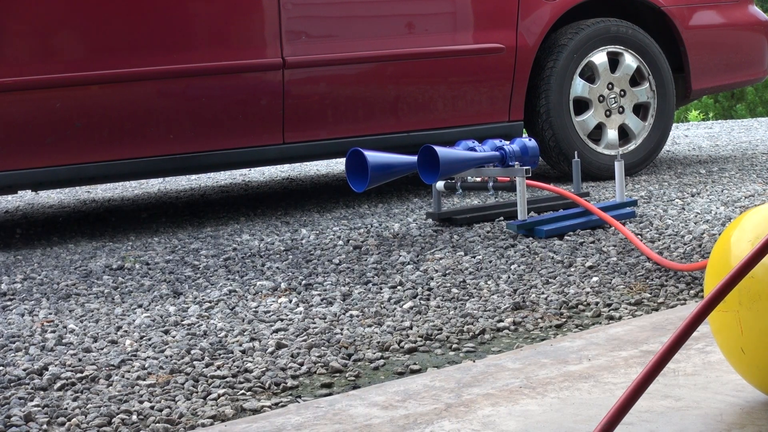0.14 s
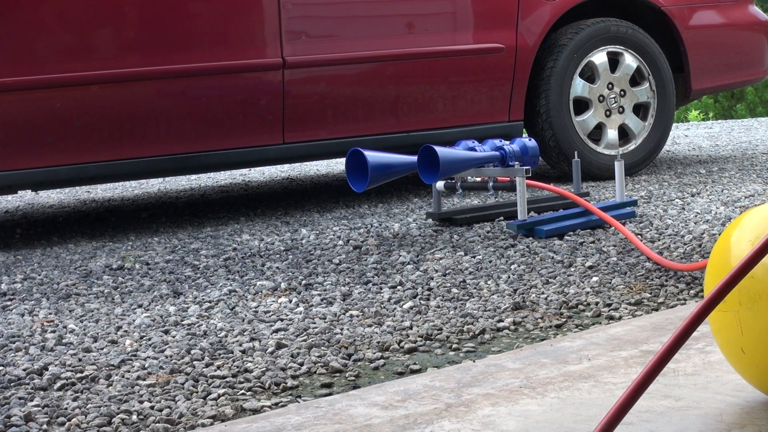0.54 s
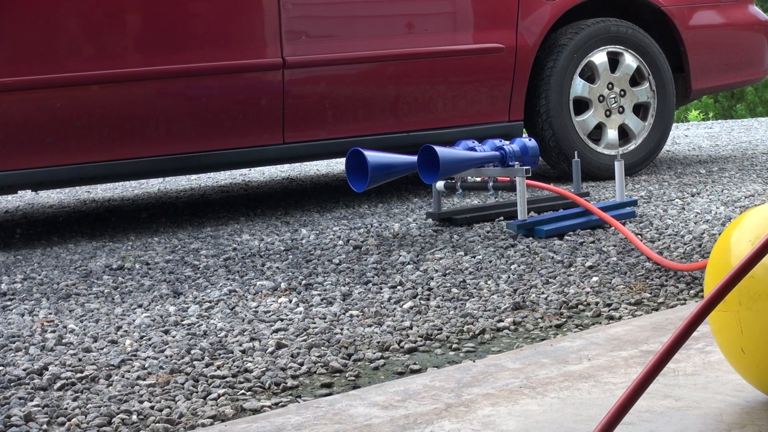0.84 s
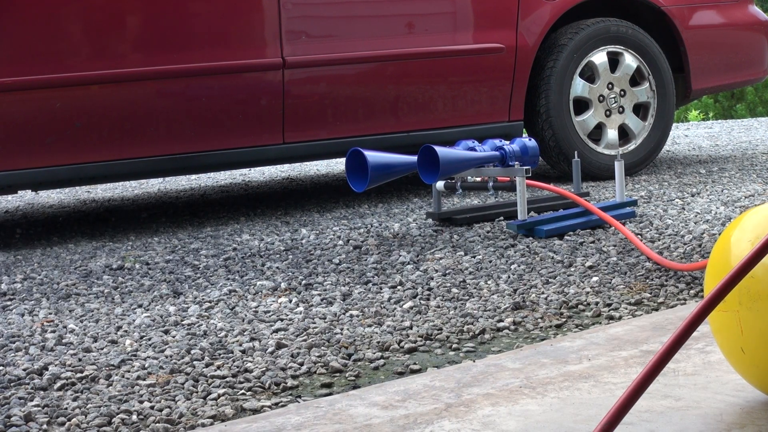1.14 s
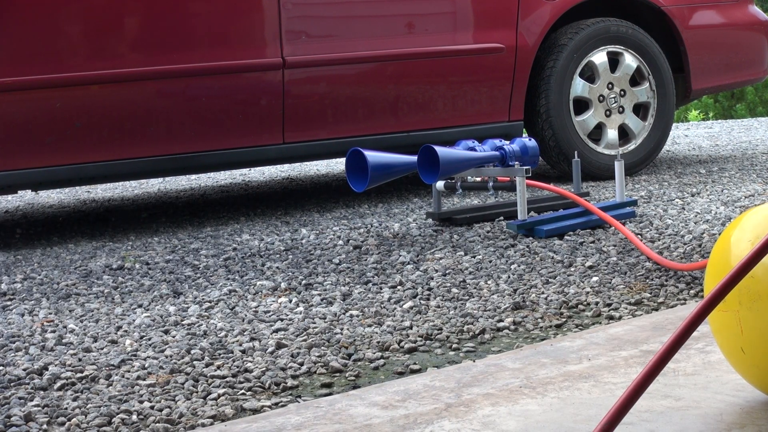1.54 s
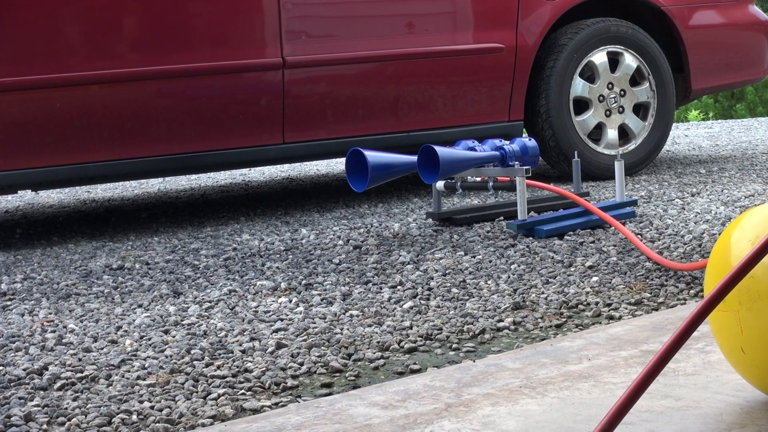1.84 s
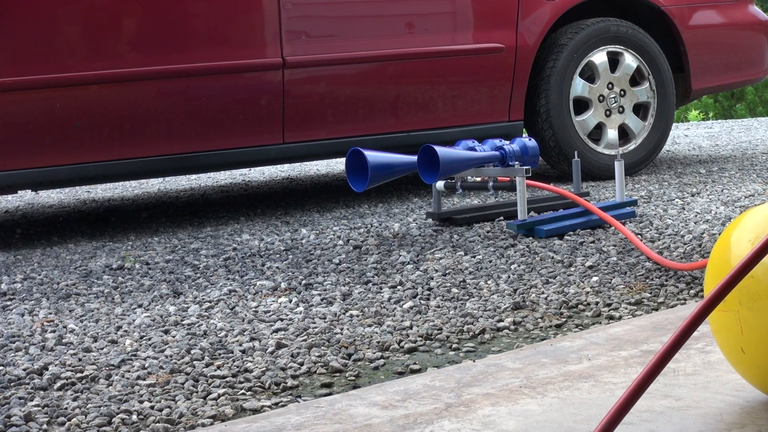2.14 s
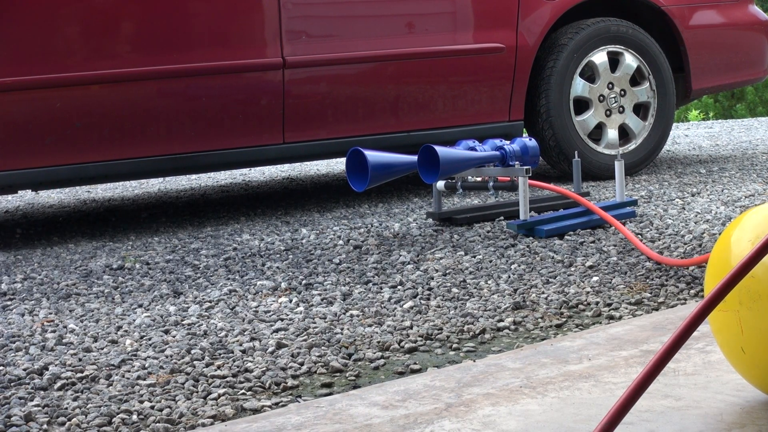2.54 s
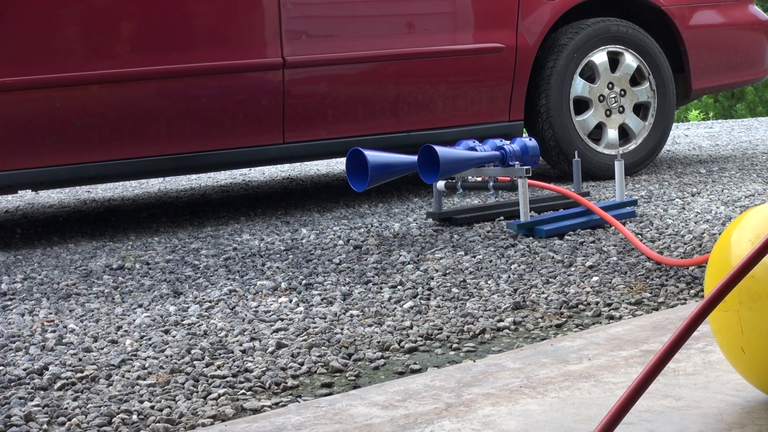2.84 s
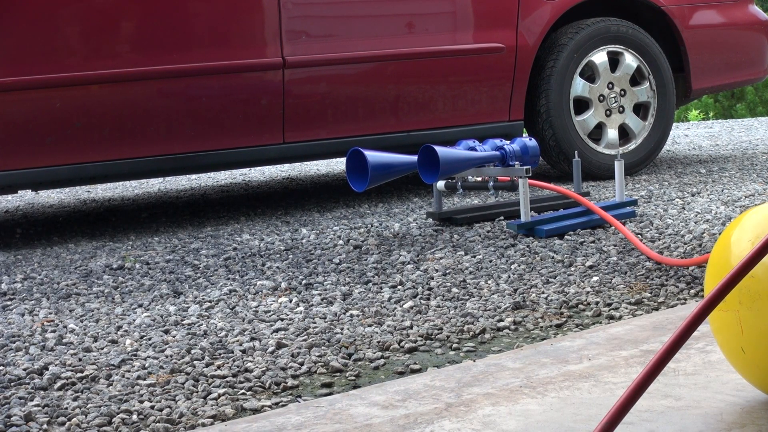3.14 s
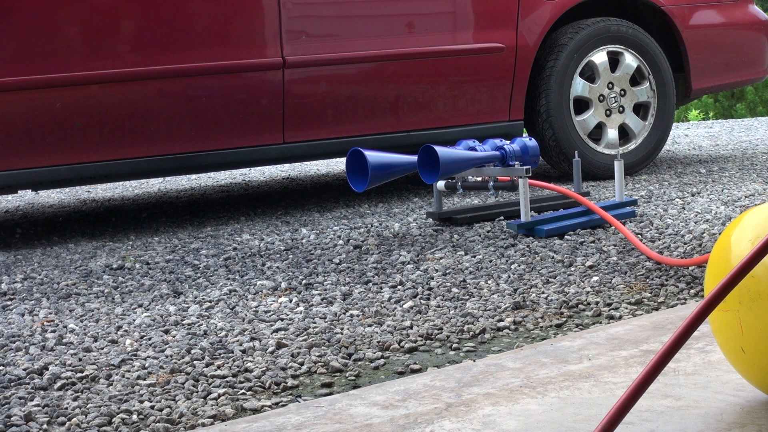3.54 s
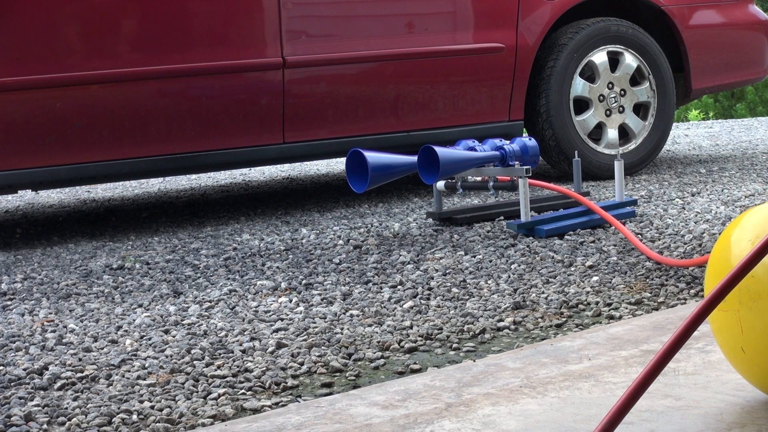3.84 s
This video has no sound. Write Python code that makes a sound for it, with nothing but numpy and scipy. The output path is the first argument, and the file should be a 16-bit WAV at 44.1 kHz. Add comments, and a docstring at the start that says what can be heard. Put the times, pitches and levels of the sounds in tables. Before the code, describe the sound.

Very loud multi-bell air horn beside a parked car: quiet open air with gravel scuffs, then an air hiss, notes entering in quick succession, a distorted steady blare, and a short echo as the air runs out.

```python
"""Gravel beside a parked car: a three-bell air horn heard from close by through a small camera microphone.
Quiet wait: noise of traffic and insects, gravel scuffs, wind puffs, a decaying-sine clink, bird chirps.
Then the valve hisses (coloured noise) and the bells speak one after another (stacks of overtones).
They overload the microphone and the recorder turns its gain down.
As the air runs out, delayed and coloured echoes from the surroundings are left."""
import sys
import numpy as np
from scipy import signal
from scipy.fft import rfft, irfft, next_fast_len
from scipy.io import wavfile

SR = 44100
rng = np.random.default_rng(int(sys.argv[2]) if len(sys.argv) > 2 else 0)


def output_pcm(signal):
    """Save a mono or channel-first signal as 16-bit PCM at the path in sys.argv[1].

    Samples are clipped to [-1, 1] before scaling.
    """
    pcm = np.clip(np.atleast_2d(signal).T, -1, 1) * 32767
    wavfile.write(sys.argv[1], SR, np.round(pcm).astype(np.int16))


N = 176400
TIME_S = np.arange(N) / SR


def amp(db):
    """Decibels to amplitude factor."""
    return 10 ** (np.asarray(db) / 20)


def in_time(rows):
    """Interpolates each column after t/s over the scene."""
    t_s, *columns = np.transpose(rows)
    return [np.interp(TIME_S, t_s, column) for column in columns]


def rms_one(x):
    """Scales to an RMS of 1."""
    return x / np.sqrt(np.mean(x ** 2))


def white():
    """Gaussian white noise."""
    return rng.standard_normal(N)


def drift(rate_hz):
    """Slow random wander of RMS 1: noise through a double pole at rate_hz, run at SR / 40."""
    pole = np.exp(-2 * np.pi * rate_hz * 40 / SR)
    noise = rng.standard_normal(N // 40 + 2002)
    slow = signal.lfilter([1], [1, -2 * pole, pole * pole], noise)[2000:]  # drop the run-in
    return np.interp(np.arange(N) / 40, np.arange(len(slow)), rms_one(slow))


def filtered(x, spectrum):
    """Zero-phase filter through (f/Hz, gain/dB) points, interpolated over log frequency."""
    hz, db = np.transpose(spectrum)
    size = next_fast_len(N + SR)
    log_f = np.log(np.arange(size // 2 + 1) * SR / size + 1)  # +1 avoids log(0)
    gain = amp(np.interp(log_f, np.log(hz), db))
    return irfft(rfft(x, size) * gain, size)[:N]


def coloured(x, spectrum):
    """Filtered noise of RMS 1."""
    return rms_one(filtered(x, spectrum))


def band(x, low_hz, high_hz):
    """Butterworth band-pass."""
    return signal.sosfilt(signal.butter(2, [low_hz, high_hz], "band", fs=SR, output="sos"), x)


def swells(rows):
    """Sum of Gaussian-shaped envelopes, each peaking half a length after its start."""
    return sum(amp(db) * np.exp(-8 * ((TIME_S - start_s) / length_s - .5) ** 2)
               for start_s, length_s, db in rows)


# distant traffic and open air: f/Hz, relative level/dB
AIR_COLOUR = [(15, -51), (25, -37), (58, 5), (119, -1), (169, -9.5), (198, -2.5), (340, -18.5), (378, -15),
              (567, -22.5), (871, -21), (2120, -34), (4620, -38.5), (15500, -49)]
AIR_DB, RUMBLE_SWELL_DB = -55.5, 2


def traffic_and_air():
    """Steady coloured noise whose 25-370 Hz rumble swells at random."""
    air = amp(AIR_DB) * coloured(white(), AIR_COLOUR)
    swell = amp(RUMBLE_SWELL_DB * drift(8)) - 1
    return air + swell * band(air, 25, 370)


# insect level: t/s, level/dB
INSECT_LEVEL = [(0., -87), (.7, -81), (.95, -85), (2.0, -83.5)]
INSECT_HZ, INSECT_WIDTH_HZ = 4670, 250


def insects():
    """Narrow noise band of unsteady level."""
    half_hz = INSECT_WIDTH_HZ / 2
    tone = rms_one(band(white(), INSECT_HZ - half_hz, INSECT_HZ + half_hz))
    return amp(in_time(INSECT_LEVEL)[0] + 2 * drift(20)) * tone


# gravel scuffs: start t/s, length/s, level/dB
GRAVEL_SCUFFS = [(.15, 0.064, -68), (.28, 0.055, -67), (.31, 0.15, -66.5), (.4, 0.16, -66),
                 (.66, 0.076, -61.5), (.71, 0.062, -63), (.76, 0.13, -70.5), (1.2, 0.21, -73)]
# gravel spectrum: f/Hz, relative level/dB
GRAVEL_COLOUR = [(530, -44.5), (900, -7), (1260, -4), (1450, -14), (1800, -3), (4880, -7.5), (7590, -14),
                 (15500, -25)]


def gravel():
    """Grainy noise: each sample gets a random boost, exponential in dB."""
    grains = white() * amp(2.4 * rng.exponential(1, N))
    return swells(GRAVEL_SCUFFS) * coloured(grains, GRAVEL_COLOUR)


# wind puffs: start t/s, length/s, level/dB
WIND_PUFFS = [(.33, 0.064, -45), (.37, 0.057, -48.5), (.43, 0.044, -44)]


def wind():
    """Low noise puffs of wind on the microphone."""
    return swells(WIND_PUFFS) * rms_one(band(white(), 32, 74))


# clink modes: f/Hz, relative level/dB, t60/s
CLINK_MODES = [(1800, -3, .25), (680, 0., .1), (400, 6, .12), (2650, -12, .08), (3420, -13, .08),
               (2950, -12, .15)]
CLINK_S, CLINK_DB, CLINK_RISE_S = 1.178, -66, .008


def clink():
    """Small struck sound: exponentially decaying sines with a linear rise."""
    t = np.maximum(TIME_S - CLINK_S, 0)
    ringing = sum(amp(CLINK_DB + db - 60 * t / t60_s) * np.sin(2 * np.pi * hz * t)
                  for hz, db, t60_s in CLINK_MODES)
    return ringing * np.minimum(t / CLINK_RISE_S, 1)


# far bird: start t/s, length/s, level/dB
BIRD_CHIRPS = [(1.335, .03, -79), (1.375, .025, -79), (1.415, .035, -78)]
CHIRP_HZ = 6800


def bird():
    """Short bursts of a narrow noise band."""
    return swells(BIRD_CHIRPS) * rms_one(band(white(), CHIRP_HZ - 300, CHIRP_HZ + 300))


def air_noise(level, colour):
    """Turbulent air: coloured noise of wavering level, gated to its table's span."""
    level_db, = in_time(level)
    gate = (TIME_S > level[0][0]) * (TIME_S < level[-1][0])
    return amp(level_db + drift(18)) * gate * coloured(white(), colour)


# leak at the valve: t/s, level/dB
VALVE_LEVEL = [(1.915, -67), (1.925, -49.5), (1.97, -50), (2.02, -43.5), (2.1, -32), (2.2, -4), (2.38, -7),
               (2.45, -38)]
# valve spectrum: f/Hz, relative level/dB
VALVE_SPECTRUM = [(180, -37), (300, -1), (543, 0), (731, -9), (907, -18), (1070, -17), (1970, -13),
                  (3810, -2), (4800, -10), (6460, -12), (15500, -20.5)]


def valve_hiss():
    """Compressed air leaking at the valve."""
    return air_noise(VALVE_LEVEL, VALVE_SPECTRUM)


# air through the bells: t/s, level/dB
RUSH_LEVEL = [(1.97, -77), (2.0, -47), (2.04, -31.5), (2.08, -29.5), (2.13, -22), (2.38, 0), (2.43, -34),
              (3.7, -11), (3.8, 7), (3.9, -6.5)]
# rush spectrum: f/Hz, relative level/dB
RUSH_SPECTRUM = [(530, -12), (900, 8), (1050, -31), (1160, 12), (1260, 6), (1730, -11), (2360, 5),
                 (3030, 6.5), (4660, -43), (6650, -18), (15500, -32)]


def bell_rush():
    """Compressed air rushing through the bells."""
    return air_noise(RUSH_LEVEL, RUSH_SPECTRUM)


WAVER_HZ, WAVER_DB = .25, .5  # RMS unsteadiness of pitch and level
TOP_FALL_DB = 6.5  # loss per overtone beyond the tone table
DULL_BEND = 1.348  # dulling grows as this power of octaves above the fundamental


def bell(pitch, blow, tone, root_db=0):
    """Beating diaphragm: 32 harmonics whose balance follows the blowing; root_db is the fundamental's alone."""
    hz, = in_time(pitch)
    level_db, dull_db = in_time(blow)
    phase = 2 * np.pi * np.cumsum(hz + WAVER_HZ * drift(14.9)) / SR
    multiple, tone_db = np.transpose(tone)
    out = np.zeros(N)
    for m in range(1, 33):
        partial_db = np.interp(m, multiple, tone_db - tone_db[0])
        partial_db = partial_db - TOP_FALL_DB * max(m - multiple[-1], 0) + root_db * (m == 1)
        partial_db = partial_db - dull_db * np.log2(m) ** DULL_BEND
        out += amp(partial_db) * np.sin(m * phase + rng.uniform(0, 2 * np.pi))
    gate = (TIME_S > blow[0][0]) * (TIME_S < blow[-1][0])
    return out * amp(level_db + WAVER_DB * drift(7.3)) * gate


# high bell pitch: t/s, f/Hz
HIGH_BELL_PITCH = [(2.03, 375.8), (2.4, 375.4), (2.47, 378), (2.55, 375.5), (2.66, 373.7), (3.0, 373.1),
                   (3.52, 372.8), (3.68, 370.8), (3.8, 372.6), (3.95, 372)]
# high bell blowing: t/s, level/dB, overtone dulling at one octave/dB
HIGH_BELL_BLOW = [(1.97, -62, 11), (2.03, -34, 13), (2.09, -3, 25.5), (2.141, 19, 10), (2.2, 26.5, 5),
                  (2.38, 24, 3), (2.422, 33, 0.5), (3.7, 32, 0.5), (3.78, 29, 7), (3.86, 24, 11.5),
                  (3.9, 13.5, 11), (3.95, -9, 9)]
# high bell overtones at zero dulling: multiple of f, level/dB (used re first row)
HIGH_BELL_TONE = [(1, 2), (2, 0.5), (3, -10), (4, -18), (5, -33), (6, -13), (7, -17), (8, -8), (9, -23),
                  (10, -13), (11, -39), (12, -23)]


def high_bell():
    """Highest diaphragm, near 374 Hz."""
    return bell(HIGH_BELL_PITCH, HIGH_BELL_BLOW, HIGH_BELL_TONE)


# low bell pitch: t/s, f/Hz
LOW_BELL_PITCH = [(2.05, 261.4), (2.4, 261.0), (2.47, 261.7), (2.65, 260.2), (3.0, 259.7), (3.52, 259.3),
                  (3.66, 258.3), (3.9, 258.4)]
# low bell blowing: t/s, level/dB, overtone dulling at one octave/dB
LOW_BELL_BLOW = [(1.99, -64, -3), (2.051, -40.5, 0.5), (2.102, -12.5, 16), (2.142, 11, 4), (2.198, 20.5, 3),
                 (2.381, 23.5, 4.5), (2.5, 18.5, -1), (3.65, 18, 1), (3.779, 25, 2.5), (3.86, 13, 8),
                 (3.92, -40, 1)]
# low bell overtones at zero dulling: multiple of f, level/dB (used re first row)
LOW_BELL_TONE = [(1, -2.5), (2, 3), (3, -1.5), (4, -3.5), (5, -9.5), (6, -13.5), (7, -10), (8, -3),
                 (9, -14), (10, -12.5), (11, -34.5), (12, -22.5)]
# low bell, change in the fundamental alone: t/s, level/dB
LOW_BELL_ROOT = [(2.12, 4), (2.17, -11), (2.4, -12.5), (2.5, 0.), (3.68, 2.5), (3.8, -13), (3.87, 1.5)]


def low_bell():
    """Lowest diaphragm, near 260 Hz, with its fundamental's level moving separately."""
    return bell(LOW_BELL_PITCH, LOW_BELL_BLOW, LOW_BELL_TONE, *in_time(LOW_BELL_ROOT))


# middle bell pitch: t/s, f/Hz
MID_BELL_PITCH = [(2.44, 320), (2.5, 316.8), (2.61, 315.3), (2.82, 314.7), (3.5, 314.2), (3.66, 312.0),
                  (3.9, 312.2)]
# middle bell blowing: t/s, level/dB, overtone dulling at one octave/dB
MID_BELL_BLOW = [(2.38, -26, 11), (2.44, 25, 1.5), (2.49, 27, -0.5), (3.0, 25, -1), (3.65, 26, -0.5),
                 (3.74, 26, 1.5), (3.82, -3, 8), (3.9, -37, -5)]
# middle bell overtones at zero dulling: multiple of f, level/dB (used re first row)
MID_BELL_TONE = [(1, -1), (2, -12.5), (3, -2.5), (4, -14.5), (5, -16.5), (6, -21), (7, -7.5), (8, -9.5),
                 (9, -13), (10, -10), (11, -20.5), (12, -20)]


def mid_bell():
    """Middle diaphragm, near 315 Hz."""
    return bell(MID_BELL_PITCH, MID_BELL_BLOW, MID_BELL_TONE)


# send into the echo, one per bell (low, mid, high): level/dB
BELL_SEND_DB = [-14, -29, -28.5]
# echo spectrum: f/Hz, gain/dB
ECHO_SPECTRUM = [(255, -11.5), (315, -4.5), (375, -11.5), (520, -12), (630, 2.5), (760, -2.5), (940, -6),
                 (1040, -1), (1300, -5), (1560, -4.5), (1810, 0.5), (2070, -13.5), (2600, -9), (4000, -6),
                 (8000, 33), (15000, 10)]
# reflections: delay/s, level/dB
REFLECTIONS = [(.17, -15.5), (.26, 3), (.41, -3.5)]


def echoes(low, mid, high):
    """Delayed, coloured copies of the bells from the surroundings."""
    far = filtered(amp(BELL_SEND_DB) @ np.array([low, mid, high]), ECHO_SPECTRUM)
    far = far * (TIME_S > LOW_BELL_BLOW[0][0])  # no filter ringing ahead of the blast
    return sum(amp(db) * np.pad(far, (int(delay_s * SR), 0))[:N] for delay_s, db in REFLECTIONS)


# diffuse echo of the air noise: t/s, level/dB
AFTER_LEVEL = [(3.8, -30), (3.9, -7.5), (4.05, -2.5)]
# diffuse echo spectrum: f/Hz, relative level/dB
AFTER_SPECTRUM = [(150, -36.5), (250, -18), (450, -18), (755, -6), (852, -18), (1030, -1), (1160, -18),
                  (1850, -9), (15500, -52)]


def after_hiss():
    """Diffuse echo of the air noise, as separate noise."""
    return air_noise(AFTER_LEVEL, AFTER_SPECTRUM)


def scene():
    """Sums all sources into two identical channels."""
    yard = traffic_and_air() + insects() + gravel() + wind() + clink() + bird()
    air = valve_hiss() + bell_rush() + after_hiss()
    high, low, mid = high_bell(), low_bell(), mid_bell()
    horn = high + low + mid + echoes(low, mid, high)
    return np.tile(yard + air + horn, (2, 1))


def gain_control(x, aim_db, attack_s, release_db_per_s, ahead_s=0):
    """Turns peaks above the aim down with a smoothed attack and lets go at a constant dB rate."""
    over_db = np.maximum(20 * np.log10(np.abs(x).max(0) + 1e-9) - aim_db, 0)
    slope_db = release_db_per_s * TIME_S
    held_db = np.maximum.accumulate(over_db + slope_db) - slope_db
    pole = np.exp(-1 / (attack_s * SR))
    cut_db = signal.lfilter([1 - pole], [1, -pole], held_db)
    ahead = int(ahead_s * SR)
    return x * amp(-np.pad(cut_db, (0, ahead), "edge")[ahead:])


OVERLOAD_DB, KNEE = 18.5, 5  # clipping ceiling; higher knee = harder corner
COUPLING_HZ, CUTOFF_HZ = 40, 15750


def record(dry):
    """The capsule clips, its coupling drops the bass, slow and fast gain control follow, the top is cut."""
    drive = dry / amp(OVERLOAD_DB)
    clipped = amp(OVERLOAD_DB) * drive / (1 + np.abs(drive) ** KNEE) ** (1 / KNEE)
    coupled = signal.lfilter(*signal.butter(1, COUPLING_HZ, "high", fs=SR), clipped)
    slow = gain_control(coupled, aim_db=-7, attack_s=.05, release_db_per_s=36)
    fast = gain_control(slow, aim_db=-2.04, attack_s=.0011, release_db_per_s=57.3, ahead_s=.0035)
    return signal.sosfilt(signal.ellip(14, .3, 70, CUTOFF_HZ, fs=SR, output="sos"), fast)


dry = scene()
out = record(dry)
output_pcm(out)
```